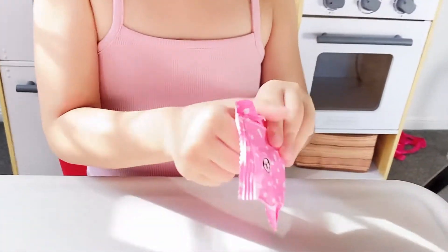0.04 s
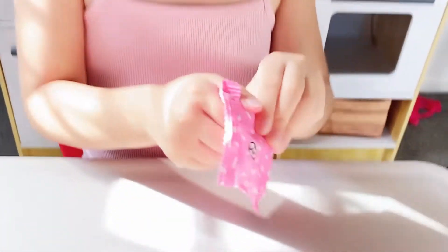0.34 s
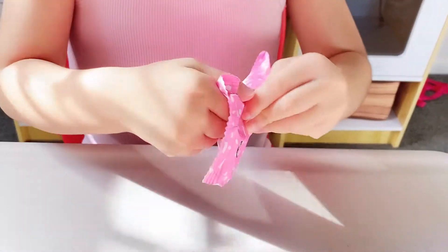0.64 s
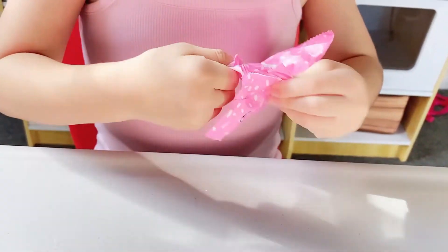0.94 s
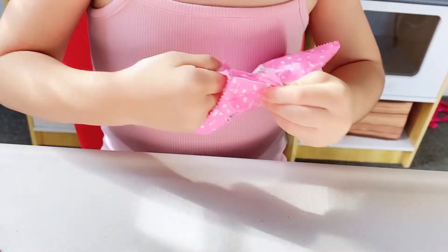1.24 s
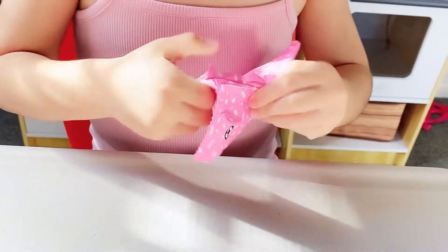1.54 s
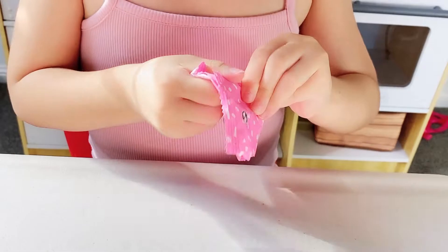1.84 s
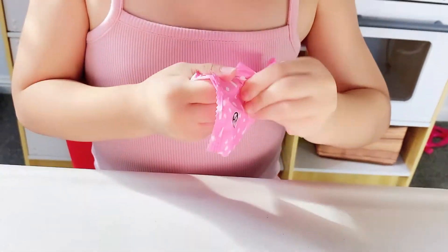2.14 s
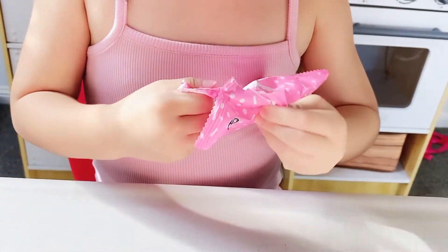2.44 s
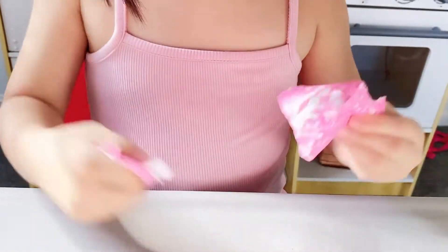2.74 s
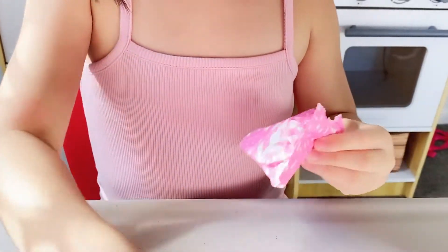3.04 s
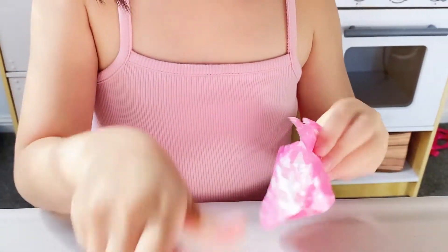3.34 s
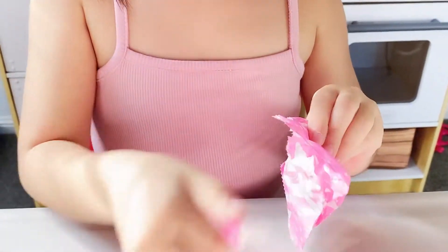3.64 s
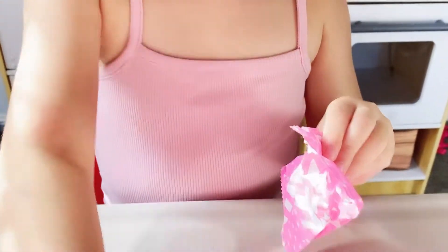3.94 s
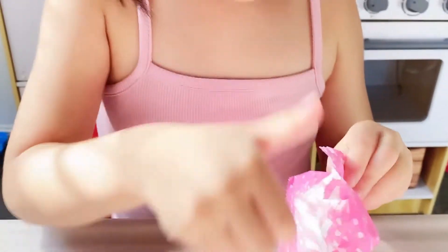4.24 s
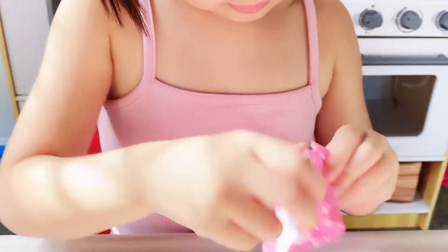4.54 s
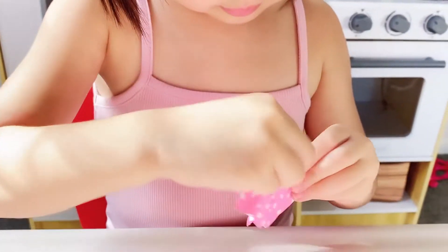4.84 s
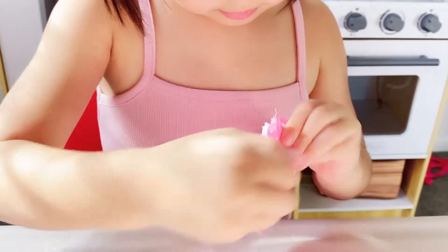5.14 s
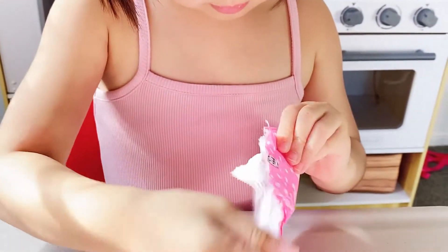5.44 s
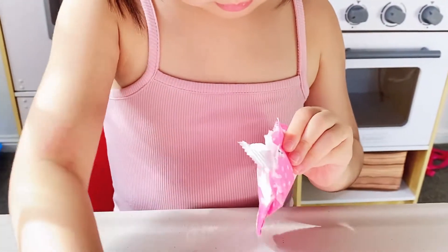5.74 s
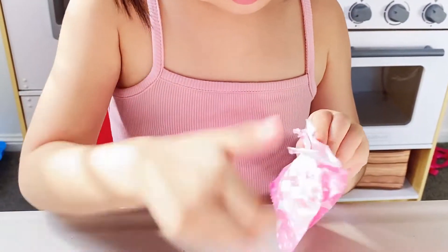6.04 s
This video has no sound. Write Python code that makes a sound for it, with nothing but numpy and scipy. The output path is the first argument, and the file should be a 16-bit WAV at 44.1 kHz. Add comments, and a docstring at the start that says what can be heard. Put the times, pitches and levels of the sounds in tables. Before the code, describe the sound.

In a small, quiet room, a thin plastic wrapper crackles and creaks up close as it is pulled open with three quick rips. The crinkling thins out, and a few dull knocks on a tabletop lead into a short, stuttering rub of a hand and arm. Two more pulls tear a strip from the wrapper, leaving only faint brushing and light fingertip taps.

```python
"""Small fingers open a thin plastic wrapper over a table, close to the microphone in a small, quiet room.
First the film crinkles and creaks, snaps as its creases buckle, and gives way in three short rips.
From about 3.3 s a hand knocks on the table top, then sticks and slips across it, sending bending waves
through the board as falling chirps. From 4.7 s a strip is torn off in two pulls and a faint, narrow ring
dies away; soft brushing and a few light taps come last."""
import sys
import numpy as np
from scipy import signal
from scipy.fft import rfft, irfft, next_fast_len
from scipy.io import wavfile
from scipy.ndimage import map_coordinates

SR = 44100
rng = np.random.default_rng(int(sys.argv[2]) if len(sys.argv) > 2 else 0)


def store_pcm(level_fs):
    """Save levels as 16-bit WAV."""
    pcm = np.round(np.clip(level_fs, -1, 1) * 32767).astype(np.int16)
    wavfile.write(sys.argv[1], SR, np.atleast_2d(pcm).T)


N = 268569
TIME = np.arange(N) / SR
HIT_TIME = np.arange(8192) / SR  # time axis of one short event [s]

# spectrum of slack film: (frequency [Hz], level [dB])
SLACK_FILM = [(240, -63), (400, -24), (708, -19.5), (865, -17), (1130, -12), (2090, -9.5), (2930, 4),
              (3750, 1.5), (5190, -7), (6950, -16.5), (8900, -38.5), (11400, -34), (16000, -37)]
# spectrum of the whole sheet moving: (frequency [Hz], level [dB])
WHOLE_SHEET = [(150, -27.5), (450, -19.5), (750, -2.5), (1100, -2.5), (1900, -1), (3000, -2.5),
               (6000, -47.5)]
# spectrum of the finest creases: (frequency [Hz], level [dB])
FINE_CREASES = [(4000, -7.5), (8500, -6), (11300, 0), (13500, -17), (15500, -16)]


def amp(db):
    """Decibels to gain."""
    return 10 ** (np.asarray(db) / 20)


def unit(x):
    """Scaled to rms 1."""
    return x / np.sqrt(np.mean(x ** 2) + 1e-20)


def unit_peak(x):
    """Scaled to peak 1."""
    return x / np.abs(x).max()


def along(points, hz):
    """Interpolate (frequency [Hz], value) points on a log frequency axis."""
    frequencies, values = np.transpose(points)
    return np.interp(np.log(hz + 1), np.log(frequencies + 1), values)


def coloured(x, spectrum):
    """x through a minimum-phase filter shaped by (frequency [Hz], level [dB]) points."""
    size = 2 * next_fast_len(len(x))
    gain = amp(along(spectrum, np.fft.rfftfreq(size, 1 / SR)))
    cepstrum = irfft(np.log(gain + 1e-6))
    cepstrum[1:size // 2] *= 2
    cepstrum[size // 2 + 1:] = 0
    return irfft(rfft(x, size) * np.exp(rfft(cepstrum)))[:len(x)]


def add(track, time_s, sound):
    """Mix a sound into the track at time_s."""
    start = max(round(time_s * SR), 0)
    track[start:start + len(sound)] += sound[:N - start]


def burst(spectrum, t60, rise_s):
    """A short puff of coloured noise that swells and dies, peak 1."""
    envelope = (1 - np.exp(-(HIT_TIME / rise_s) ** 2)) * amp(-60 * HIT_TIME / t60)
    return unit_peak(coloured(rng.standard_normal(len(HIT_TIME)) * envelope, spectrum))


def crackle(spectrum, rate, spread_db, hiss):
    """About rate tiny clicks a second, of uneven size, on a bed of noise, rms 1."""
    size = amp(spread_db * np.minimum(rng.exponential(size=N), 3))
    clicks = (rng.random(N) < rate / SR) * size * rng.choice([-1, 1], N)
    return unit(coloured(unit(clicks) + hiss * rng.standard_normal(N), spectrum))


def clumps(rate, depth_db):
    """Uneven gain of rms 1: the fingers catch and slip about rate times a second."""
    knots = rng.standard_normal(int(N * rate / SR) + 4)
    wander = map_coordinates(knots, [TIME * rate])
    return unit(amp(depth_db * np.tanh(wander)))


def gestures(moves, attack_s, release_s):
    """Gain per sample: each move rises 20 dB per attack_s, holds, then falls 20 dB per release_s."""
    power = np.zeros(N)
    for start, hold, db in moves:
        away = np.maximum((start - TIME) / attack_s, (TIME - start - hold) / release_s)
        near = away < 4  # within 80 dB of the held level
        power[near] += amp(db - 20 * np.maximum(away[near], 0)) ** 2
    return np.sqrt(power)


def room_tone(level_db=-57):
    """The steady, low background noise of the room."""
    # (frequency [Hz], level [dB])
    spectrum = [(12, -29.5), (20, -15.5), (55, -1.5), (113, -6), (168, -12.5), (198, -5.5), (270, -8.5),
                (485, -19.5), (678, -14), (949, -25), (1710, -26.5), (3160, -21), (4810, -42.5),
                (16000, -41)]
    return amp(level_db) * unit(coloured(rng.standard_normal(N), spectrum))


def room_reverb(x, early_db=3, early_t60=0.11, predelay_s=0.003):
    """Near walls answer quickly, then a diffuse tail dies at its own speed for each frequency."""
    # the room's decay: (frequency [Hz], time to fall 60 dB [s])
    decay_times = [(100, 0.17), (800, 0.58), (3000, 0.31), (6000, 0.5), (12000, 0.3)]
    hz, t, noise = signal.stft(rng.standard_normal(SR), SR, nperseg=256)
    diffuse = amp(-60 * t / along(decay_times, hz)[:, None])
    early = amp(early_db - 60 * t / early_t60)
    tail = signal.istft(noise * (diffuse + early), SR, nperseg=256)[1]
    response = np.concatenate([np.zeros(round(predelay_s * SR)), tail / np.linalg.norm(tail)])
    return signal.fftconvolve(x, response)[:N]


def faint_ring(ring_hz=3300, t60=0.3, waver_per_s=220):
    """A faint, wavering, narrow ring dies away after the last tear."""
    # the ring's onset: (time [s], level [dB])
    onset = (5.1, -29.5)
    time_s, db = onset
    out = np.zeros(N)
    waver = unit(map_coordinates(rng.standard_normal(len(HIT_TIME)), [HIT_TIME * waver_per_s]))
    ring = amp(db - 60 * HIT_TIME / t60) * np.sin(2 * np.pi * ring_hz * HIT_TIME)
    add(out, time_s, waver * ring)
    return out


def arm_rumble(gain_db=-1):
    """Arm and clothes move against the table edge with a low rumble."""
    # the arm shifts its weight: (start [s], hold [s], level [dB])
    shifts = [(2.75, 0.085, -51.5), (4.595, .04, -45), (4.7, .025, -48)]
    # (frequency [Hz], level [dB])
    spectrum = [(20, -14.5), (50, 4), (95, -3), (160, -6.5), (300, -12.5), (700, -50.5)]
    rumble = unit(coloured(rng.standard_normal(N), spectrum))
    return amp(gain_db) * gestures(shifts, attack_s=0.07, release_s=0.18) * rumble


def arm_drag(gain_db=-4):
    """The arm rubs the table top with a dull, grainy friction noise."""
    # the arm's moves: (start [s], hold [s], level [dB])
    drags = [(3.29, .01, -47.5), (3.395, 0.016, -43.5), (3.62, 0.084, -45.5), (3.815, .01, -44.5),
             (4.045, 0.041, -26.5), (4.12, 0.04, -31.5), (4.19, 0.081, -36), (4.38, 0.0064, -43.5)]
    # (frequency [Hz], level [dB])
    rubbed_board = [(24, -56), (40, -16), (108, 0.5), (197, -10), (288, -4), (547, -8), (1360, -20),
                    (2160, -22), (3680, -29.5), (8000, -57), (10400, -65), (17600, -120)]
    friction = crackle(rubbed_board, rate=630, spread_db=3, hiss=0.9)
    return amp(gain_db) * gestures(drags, attack_s=0.057, release_s=0.06) * friction


def bending(x, travel_s):
    """Bending waves run as the root of frequency, so bass comes last; travel_s is the delay at 1 kHz."""
    hz = np.fft.rfftfreq(len(x), 1 / SR)
    return irfft(rfft(x) * np.exp(-4j * np.pi * travel_s * np.sqrt(1000 * hz)))


def judder(scatter_db=2.5, thud_db_per_s=37, click_db_per_s=-51):
    """The hand sticks and slips: rows of knocks that grow duller as the arm settles."""
    # fastest where the hand pushes hardest: (time [s], gap between slips [s], level [dB])
    stick_slip = [(3.937, .02, -19), (3.957, .02, -17), (3.99, 0.013, -15), (4.047, .0145, -13),
                  (4.062, .022, -13), (4.111, 0.034, -19), (4.16, .035, -19)]
    times, gaps, levels = np.transpose(stick_slip)
    time_s, slips = times[0], []
    while time_s < times[-1]:
        age = time_s - times[0]
        db = np.interp(time_s, times, levels) + scatter_db * rng.standard_normal()
        slips.append((time_s, db, -9.5 + thud_db_per_s * age, -6 + click_db_per_s * age))
        time_s += np.interp(time_s, times, gaps)
    return slips


def table_knocks(travel_s=0.004004, thud_db=-4, bump_db=-2, scuff_db=-12):
    """Each knock or slip scuffs, then sends a falling chirp through the board; the arm bumps softly."""
    # the hand knocks: (time [s], level [dB], relative thud [dB], relative click [dB])
    knocks = [(3.301, -27.5, -1, -22), (3.316, -22, -3, -25), (3.331, -17, -13.5, -10),
              (3.513, -15.5, -14, -5), (3.545, -28, -10.5, -6.5), (3.607, -23.5, -12.5, -11)]
    # the arm bumps: (time [s], level [dB])
    bumps = [(3.41, -39), (3.729, -43), (4.238, -35), (4.288, -33.5), (4.384, -34.5), (4.587, -36.5)]
    # (frequency [Hz], level [dB])
    struck_board = [(20, -36), (42, -7), (68, 1), (150, -3.5), (300, -9.5), (600, -18.5), (1200, -21.5),
                    (3000, -65.5)]
    # skin letting go of the board: (frequency [Hz], level [dB])
    skin_release = [(300, -16), (700, -1.5), (1600, 1.5), (2600, -1), (5000, -8), (9000, -28.5),
                    (16000, -62)]
    out = np.zeros(N)
    push = coloured(signal.unit_impulse(len(HIT_TIME)), struck_board)
    for time_s, db, thud, click in list(knocks) + judder():
        path_s = travel_s * np.exp(0.079 * rng.standard_normal())  # the contact point wanders
        release = burst(skin_release, t60=0.0093, rise_s=0.0018)
        low = amp(thud + thud_db) * unit_peak(bending(push, path_s))
        high = amp(click) * unit_peak(bending(release, path_s / 2))
        add(out, time_s, amp(db) * (low + high))
        scuff = burst(skin_release, t60=0.025, rise_s=0.0066)
        add(out, time_s - 0.003, amp(db + click + scuff_db) * scuff)
    soft_push = coloured(push, [(100, 10), (250, -12), (600, -58)])  # flesh damps the treble
    bump = unit_peak(bending(soft_push, travel_s))
    for time_s, db in bumps:
        add(out, time_s - travel_s, amp(db + bump_db) * bump)
    return out


def brushing(gain_db=-1):
    """Skin and film brush along with uneven friction, and a hand sweeps twice over the table."""
    # brushing moves: (start [s], hold [s], level [dB])
    strokes = [(3.335, .01, -51), (3.42, 0.065, -48.5), (3.612, 0.11, -49), (3.77, .04, -59.5),
               (3.98, .3, -59.5), (4.145, .005, -42), (4.35, 0.071, -49.5), (4.56, 0.054, -48),
               (4.635, 0.026, -41), (4.7, 0.16, -44), (5.005, 0.15, -42.5), (5.29, 0.0082, -53),
               (5.3, 0.42, -66), (5.71, 0.012, -57), (5.79, 0.46, -54), (5.935, 0.019, -42)]
    # (frequency [Hz], level [dB])
    skin_spectrum = [(240, -31.5), (400, -4), (607, -4), (949, 1.5), (1130, -5.5), (3160, 4), (4580, -5.5),
                     (6850, -5), (8240, -10.5), (11200, -16), (16000, -31.5)]
    # sweeps of the hand: (start [s], hold [s], level [dB])
    sweeps = [(3.34, 0.024, -51), (3.47, 0.02, -42)]
    # (frequency [Hz], level [dB])
    sweep_spectrum = [(880, -52), (1500, -3), (2540, -26), (3880, 3), (6500, 1), (9010, -9.5),
                      (11200, -3.5), (16000, -24.5)]
    brush = clumps(rate=110, depth_db=4.5) * crackle(skin_spectrum, rate=2700, spread_db=3.5, hiss=0.61)
    brush *= gestures(strokes, attack_s=0.053, release_s=0.099)
    swish = crackle(sweep_spectrum, rate=2000, spread_db=7, hiss=0.7)
    swish *= gestures(sweeps, attack_s=0.055, release_s=0.053)
    return amp(gain_db) * (brush + swish)


def finger_taps(sheet_db=4):
    """Fingertips and wrapper edges tap: a bright scuff with a puff from the sheet."""
    # (time [s], level [dB], relative sheet level [dB])
    taps = [(3.6117, -26.5, -13), (3.6586, -29, -9), (3.7269, -33.5, -3.5), (3.8429, -44.5, -2.5),
            (4.347, -30.5, -25), (4.368, -36, 0), (4.3832, -35, -8), (4.537, -38, -3), (4.6421, -36, 1),
            (4.7091, -19, -29), (5, -27, -25), (5.453, -33, -35), (5.7776, -33, -5.5), (5.9271, -37, -9),
            (5.9352, -35, -17), (5.9507, -33, -4)]
    # (frequency [Hz], level [dB])
    scuff_spectrum = [(1000, -24), (2500, 0.5), (6000, 4), (11000, -7.5), (16000, -15)]
    out = np.zeros(N)
    for time_s, db, sheet in taps:
        scuff = burst(scuff_spectrum, t60=0.009, rise_s=0.0012)
        puff = amp(sheet + sheet_db) * burst(WHOLE_SHEET, t60=0.016, rise_s=0.002)
        add(out, time_s, amp(db) * (scuff + puff))
    return out


def facets(rate, ring_hz, scatter, cycles, spread_db):
    """Random tiny creases, each ringing for a few cycles at its own pitch, rms 1."""
    count = int(rate * N / SR)
    when, phase, strength = rng.random((count, 3)).T
    hz = ring_hz * np.exp(scatter * rng.standard_normal((count, 1)))
    turns = hz * HIT_TIME[:200]
    size = amp(-spread_db * np.log(strength + 0.03))[:, None]  # many small, a few large
    rings = size * turns * np.exp(-turns / cycles) * np.sin(2 * np.pi * (turns + phase[:, None]))
    index = (when * N).astype(int)[:, None] + np.arange(turns.shape[1])
    return unit(np.bincount(index.ravel(), rings.ravel(), N)[:N])


def crinkle(crease_db=-4, rustle_db=-3.5, fizz_db=-26, buckle_db=-42):
    """Small creases buckle in the kneaded film, over a finer rustle and fizz."""
    # the fingers hold and knead the film: (start [s], hold [s], level [dB])
    squeezes = [(0, 2.35, -51), (0, 0.22, -35), (.07, 0.031, -28), (.28, 0.1, -33.5), (.48, 0.02, -29.5),
                (.75, 0.012, -40.5), (.9, .015, -43), (1.108, 0.12, -43), (1.39, 0.19, -40),
                (1.725, 0.043, -44.5), (1.81, 0.076, -32), (2.01, .03, -47.5), (2.11, 0.057, -33.5),
                (2.3, .19, -54.5), (2.5, 0.67, -59.5), (2.63, 0.037, -50), (2.76, .02, -60.5),
                (3.18, 0.0059, -45), (3.3, 0.072, -51.5), (4.39, .03, -53), (5.935, .02, -46.5)]
    effort = gestures(squeezes, attack_s=0.051, release_s=0.12)
    buckling = effort / (effort + amp(buckle_db))  # a light touch only rustles
    creases = buckling * facets(rate=190, ring_hz=3600, scatter=0.11, cycles=1.07, spread_db=3)
    rustle = clumps(rate=150, depth_db=3) * crackle(SLACK_FILM, rate=700, spread_db=4, hiss=0.82)
    fizz = clumps(rate=31, depth_db=1) * crackle(FINE_CREASES, rate=300, spread_db=1.5, hiss=0.34)
    return effort * (amp(crease_db) * creases + amp(rustle_db) * rustle + amp(fizz_db) * fizz)


def creak(gain_db=-1):
    """Pulled taut, the film creaks lower than it crinkles."""
    # pulls on the film: (start [s], hold [s], level [dB])
    pulls = [(.785, 0.034, -39.5), (.89, .02, -42.5), (1.12, 0.095, -54.5), (1.42, .08, -53),
             (1.54, .02, -41), (1.61, 0.029, -51.5)]
    # (frequency [Hz], level [dB])
    stretched_film = [(400, -25.5), (800, -21), (1300, -4), (1900, 1), (2400, -1.5), (3200, -19),
                      (6000, -44)]
    tension = gestures(pulls, attack_s=0.015, release_s=0.13)
    return amp(gain_db) * tension * crackle(stretched_film, rate=1200, spread_db=5.5, hiss=0.72)


def tearing(seam_db=-2, buckle_db=-7, sparkle_db=-26, crisp_db=-14):
    """Dense trains of tiny fractures: the taut seam rings and buckles, the loose strip sounds broader."""
    # the seam gives way: (start [s], hold [s], level [dB])
    seam_rips = [(.515, 0.027, -16), (1.829, 0.0095, -13.5), (1.845, 0.0096, -19), (2.129, .028, -14.5),
                 (5.088, 0.028, -27)]
    # (frequency [Hz], level [dB])
    taut_film = [(150, -33.5), (300, -25), (480, -40), (780, -19), (1080, -19), (1450, -32), (2050, -23.5),
                 (2450, -8), (3000, -2.5), (3650, -2), (4400, -15), (5400, -12.5), (7500, -31), (9200, -35),
                 (11200, -22.5), (13500, -40.5), (15500, -32.5)]
    # the strip is torn off: (start [s], hold [s], level [dB])
    strip_tears = [(4.708, .064, -25.5), (4.785, .02, -31.5), (5.052, 0.067, -29), (5.095, 0.0069, -25)]
    # (frequency [Hz], level [dB])
    loose_strip = [(88, -25.5), (150, -31), (328, -13), (494, -18), (774, -9), (1560, -18.5), (1830, -5.5),
                   (2180, -12), (2500, -5.5), (2980, -7.5), (3420, -4.5), (4080, -6.5), (11300, -16.5),
                   (13200, -30), (16000, -28.5)]
    fractures = crackle(taut_film, rate=2500, spread_db=-0.9, hiss=0.3)
    sparkle = amp(sparkle_db) * crackle(FINE_CREASES, rate=620, spread_db=4.5, hiss=0.3)
    buckles = amp(buckle_db) * facets(rate=220, ring_hz=3260, scatter=0.09, cycles=2.6, spread_db=1.5)
    seam = gestures(seam_rips, attack_s=0.014, release_s=0.014) * (fractures + sparkle + buckles)
    parting = crackle(loose_strip, rate=3500, spread_db=2, hiss=0.75)
    crisp = amp(crisp_db) * crackle(FINE_CREASES, rate=600, spread_db=5, hiss=0.2)
    strip = gestures(strip_tears, attack_s=0.0057, release_s=0.043) * (parting + crisp)
    return clumps(rate=300, depth_db=3.5) * (amp(seam_db) * seam + strip)


def crease_snaps(swell_s=0.0006, overtone_ratio=1.565, overtone_db=-15, sheet_db=-2, lead_in_db=-21):
    """A crease buckles: a facet of film rings, with a sharp crack and a puff from the sheet."""
    # (time [s], level [dB], ring frequency [Hz], relative sheet level [dB], relative crack level [dB])
    snaps = [(0.0246, -14, 2780, -20, -27.5), (0.0477, -14.5, 3530, -26, -25),
             (0.0562, -11, 4020, -9, -33.5), (.076, -8, 2980, -18, -12.5), (0.0782, -7, 3650, -31, -21),
             (.1213, -18.5, 3850, -32.5, -7), (.1795, -8.5, 3120, -16.5, -25),
             (0.2322, -6, 3960, -40.5, -39), (.277, -15.5, 3720, -28, -39), (0.3294, -18.5, 4000, -35, -26),
             (.337, -7, 3760, -41, -29), (0.3644, -10.5, 3970, -42, -11.5),
             (0.4064, -17.5, 3180, -35.5, -4.5), (.481, -17, 3290, -34, -16.5),
             (0.4985, -4, 3470, -35.5, -23.5), (.5199, -7, 3000, -18, -29.5), (.5331, -7, 3570, -20, -32.5),
             (.605, -24, 3320, -3, -27), (0.685, -26.5, 3250, -12, -12), (0.6902, -26, 3300, -16, -15),
             (0.7495, -20, 3570, -21, -21), (.761, -19, 3500, -28, -15), (0.7777, -1, 3430, -13, -21.5),
             (0.786, -10, 3950, -16.5, -16), (.803, -18, 3900, -11, -6), (0.8117, -5.5, 3770, -11, -17.5),
             (0.8837, -6, 3780, -13.5, -22), (0.888, -15.5, 4000, -21, -18.5),
             (0.9979, -17, 3740, -15.5, -28.5), (1.0803, -23, 3220, -14, -31), (1.1179, -18, 3470, -9, -26),
             (1.1737, -25.5, 3450, -3, -19), (1.2494, -27.5, 3140, -5.5, -24), (1.431, -29.5, 2920, 1, -25),
             (1.445, -19, 3360, -21.5, -14), (1.5342, -12, 3150, -12.5, -17.5),
             (1.5588, -18.5, 3580, -17.5, -25), (1.6087, -20, 3570, -5.5, -24.5),
             (1.704, -16.5, 3330, -40.5, -12.5), (1.7597, -30.5, 3300, -9, -1.5),
             (1.7957, -10.5, 3460, -14.5, -10.5), (1.8291, -5.5, 3070, -29.5, -9.5),
             (2.0076, -31, 3000, -18.5, -6.5), (2.0961, -19.5, 3270, -21, -11.5),
             (2.115, -10.5, 3320, -23, -28), (2.133, -6.5, 3510, -36, -14.5),
             (2.142, -7.5, 3080, -22.5, -9.5), (2.153, -8, 3030, -17, -10), (2.627, -33, 3030, -22, -9.5),
             (2.839, -34.5, 3030, -25, -33), (3.1809, -22, 3430, -6, -11), (3.3524, -21.5, 3420, -25, -18),
             (4.632, -23, 3440, -8, -27), (4.673, -25.5, 3470, -18, -14.5), (5.0542, -16, 3700, -8, -24),
             (5.1, -9, 3450, -6.5, -20)]
    # the sharp edge of a snap: (frequency [Hz], level [dB])
    crack_spectrum = [(2000, -19), (5300, 15), (8500, 9), (11500, 16.5), (13500, -2.5), (15500, 0)]
    out = np.zeros(N)
    age = HIT_TIME / swell_s
    swing = (age * np.exp(1 - age)) ** 2  # widest at swell_s
    for time_s, db, hz, sheet, crack in snaps:
        first_mode = np.sin(2 * np.pi * (hz * HIT_TIME + rng.random()))
        second_mode = np.sin(2 * np.pi * (overtone_ratio * hz * HIT_TIME + rng.random()))
        ring = swing * (first_mode + amp(overtone_db) * second_mode)
        roughness = 0.4 * burst(SLACK_FILM, t60=0.0096, rise_s=0.00084)
        edge = amp(crack) * burst(crack_spectrum, t60=0.0049, rise_s=0.00062)
        puff = amp(sheet + sheet_db) * burst(WHOLE_SHEET, t60=0.0077, rise_s=0.00065)
        add(out, time_s, amp(db) * (unit_peak(ring + roughness) + edge + puff))
        # a faint, short hiss swells just before each snap
        lead_in = burst(SLACK_FILM, t60=0.035, rise_s=0.0022)
        lead_in += amp(crack + 11.5) * burst(crack_spectrum, t60=0.0085, rise_s=0.003)
        add(out, time_s - rng.uniform(0.001, 0.0031), amp(db + lead_in_db) * lead_in)
    return out


def scene(snap_wet_db=-10, wrapper_wet_db=-9, table_wet_db=-17):
    """One microphone close to wrapper and table, with the small room well behind the direct sound."""
    snaps = crease_snaps()
    wrapper = crinkle() + creak() + tearing() + faint_ring() + brushing() + finger_taps()
    board = arm_drag() + table_knocks() + arm_rumble()
    background = room_tone()
    to_walls = amp(snap_wet_db) * snaps + amp(wrapper_wet_db) * wrapper + amp(table_wet_db) * board
    return (snaps + wrapper + board + room_reverb(to_walls) + background)[None]


def record(dry, ceiling=0.7, top_hz=15900):
    """The sharpest peaks are rounded off, and nothing passes above top_hz."""
    rounded = dry / (1 + np.abs(dry / ceiling) ** 8) ** (1 / 8)
    size = next_fast_len(N + SR // 2)
    passband = np.fft.rfftfreq(size, 1 / SR) < top_hz
    return irfft(rfft(rounded, size) * passband, size)[..., :N]


dry = scene()
out = record(dry)
store_pcm(out)
```